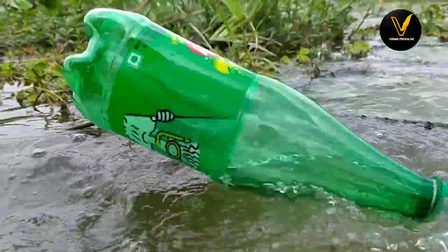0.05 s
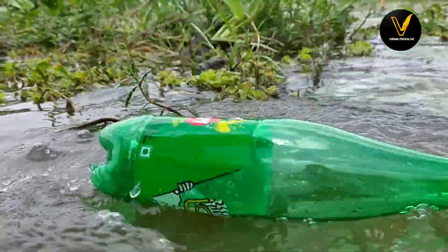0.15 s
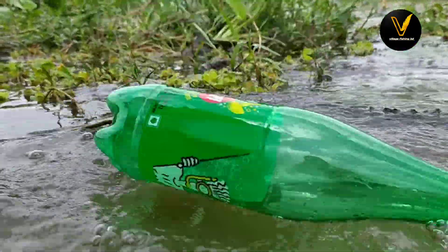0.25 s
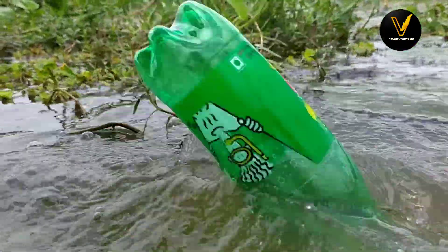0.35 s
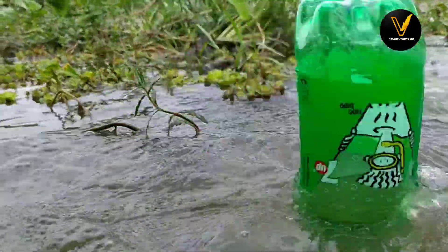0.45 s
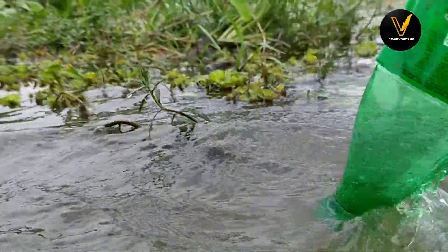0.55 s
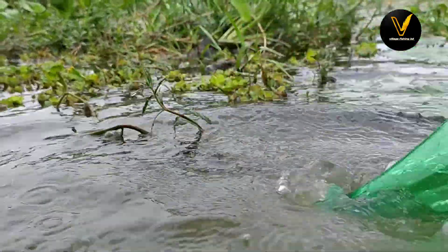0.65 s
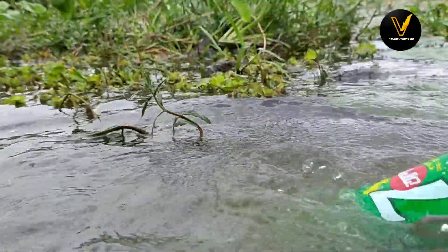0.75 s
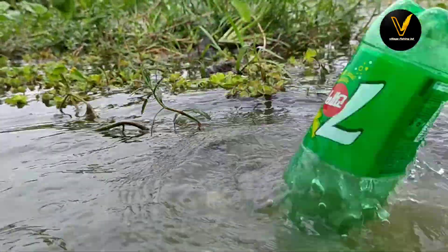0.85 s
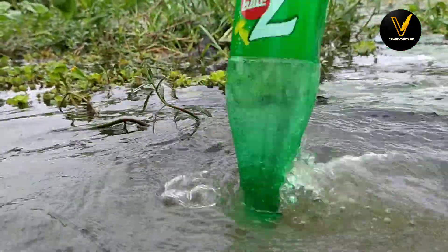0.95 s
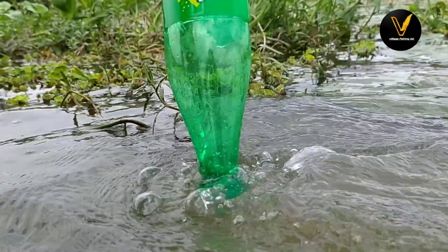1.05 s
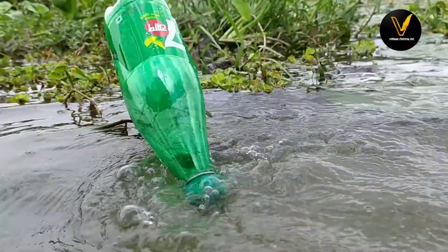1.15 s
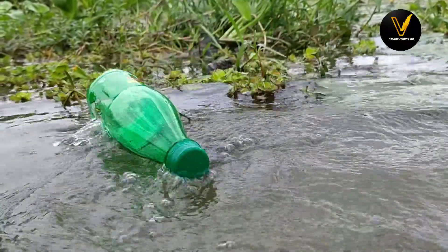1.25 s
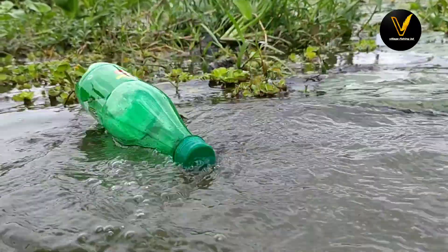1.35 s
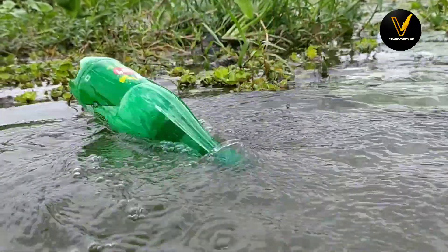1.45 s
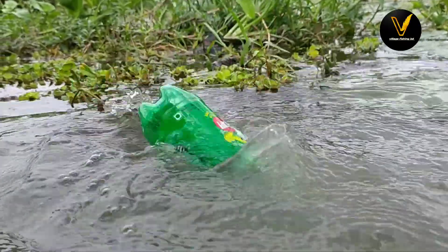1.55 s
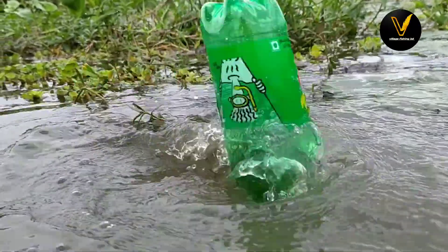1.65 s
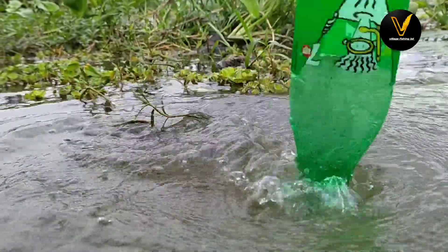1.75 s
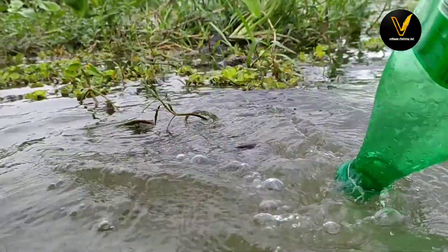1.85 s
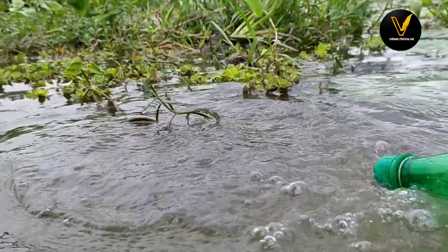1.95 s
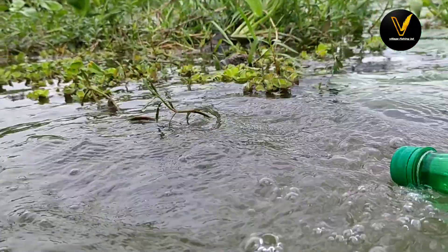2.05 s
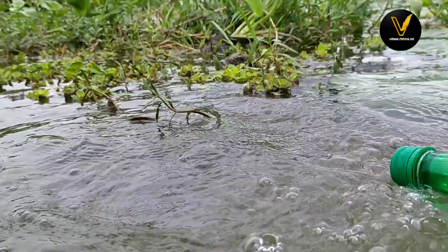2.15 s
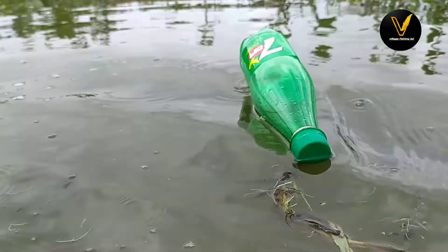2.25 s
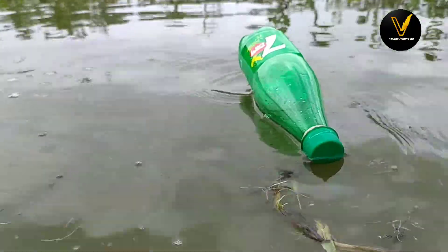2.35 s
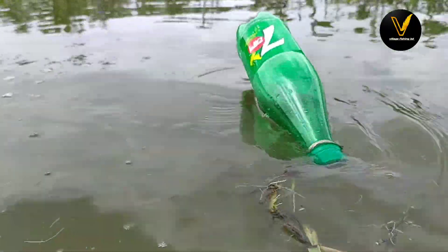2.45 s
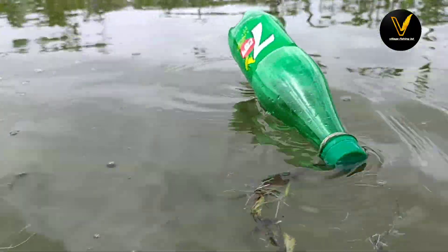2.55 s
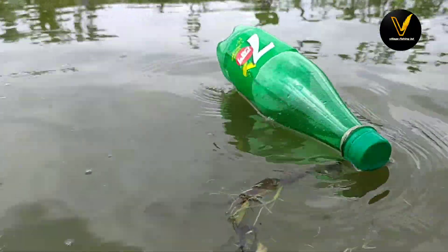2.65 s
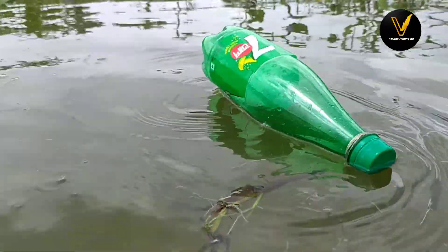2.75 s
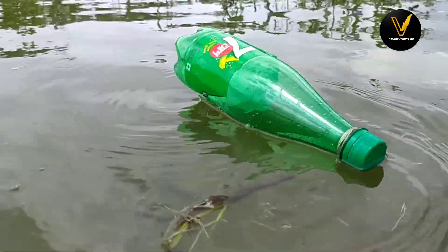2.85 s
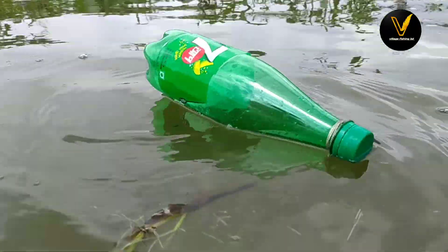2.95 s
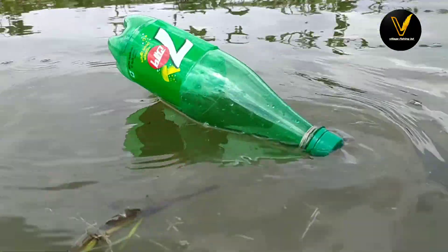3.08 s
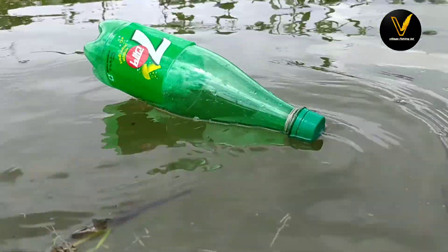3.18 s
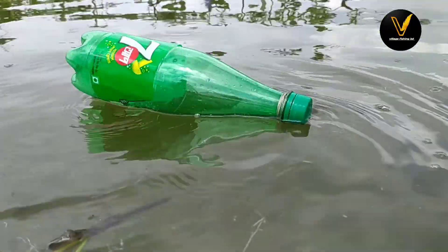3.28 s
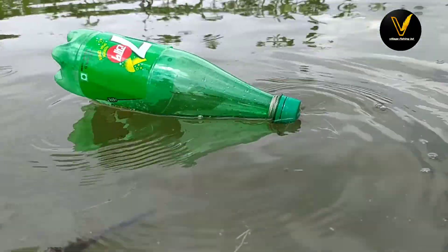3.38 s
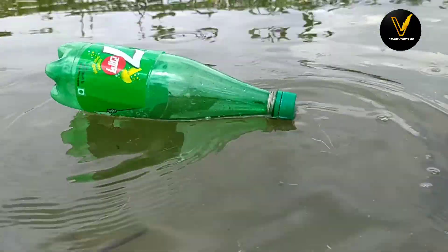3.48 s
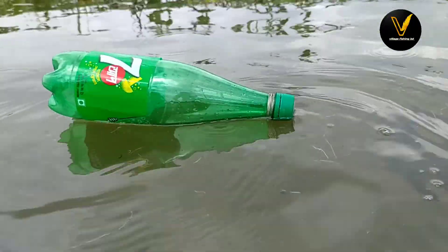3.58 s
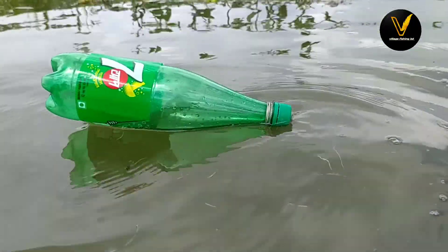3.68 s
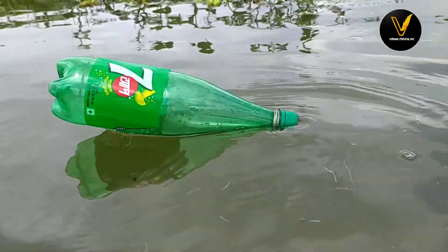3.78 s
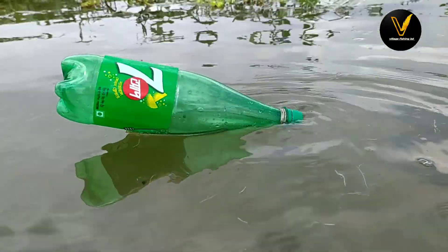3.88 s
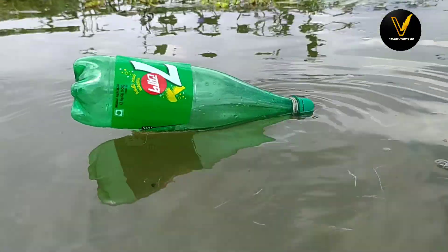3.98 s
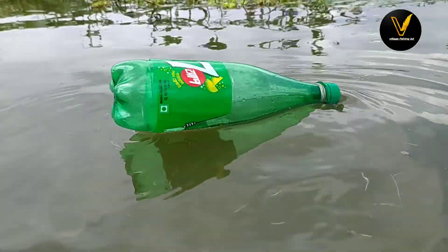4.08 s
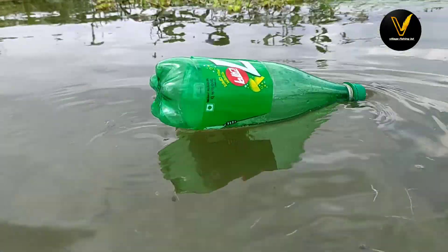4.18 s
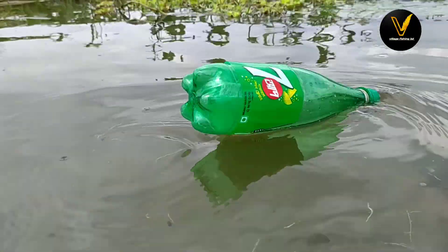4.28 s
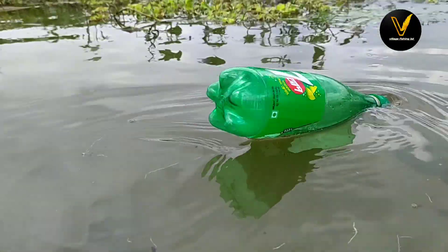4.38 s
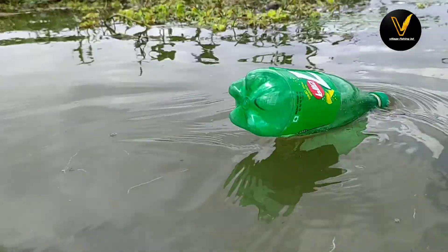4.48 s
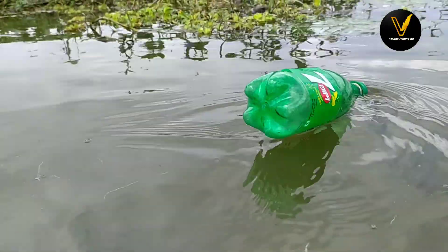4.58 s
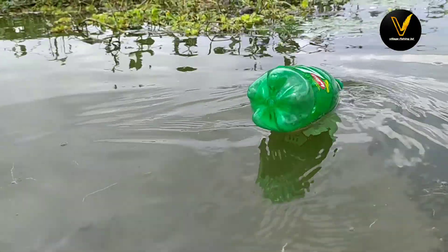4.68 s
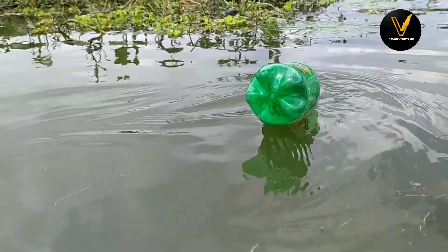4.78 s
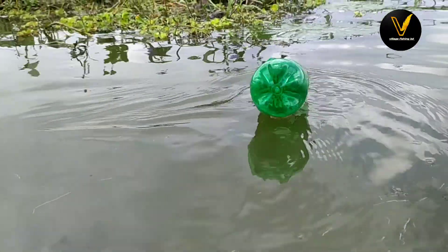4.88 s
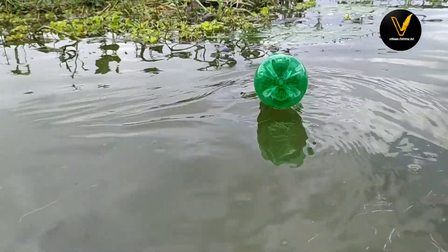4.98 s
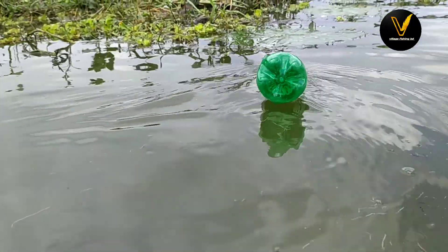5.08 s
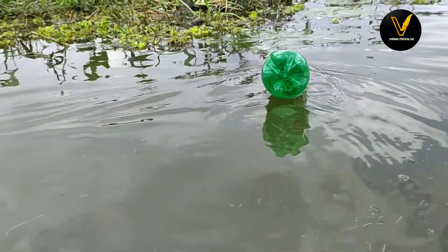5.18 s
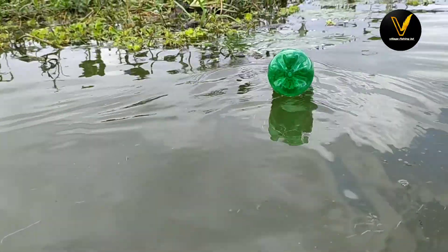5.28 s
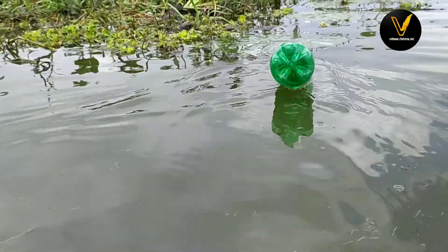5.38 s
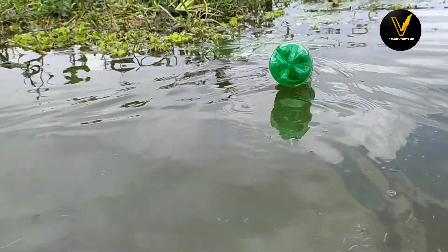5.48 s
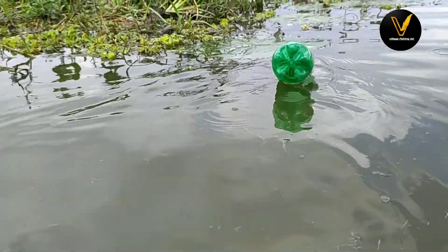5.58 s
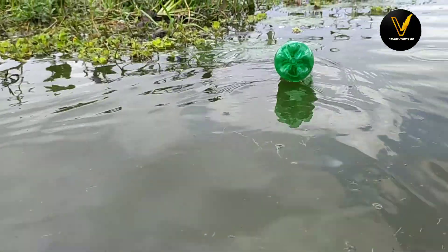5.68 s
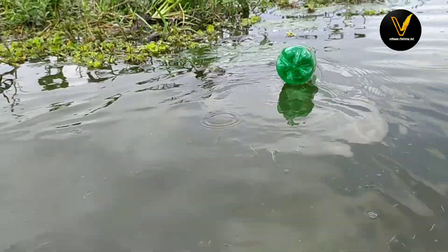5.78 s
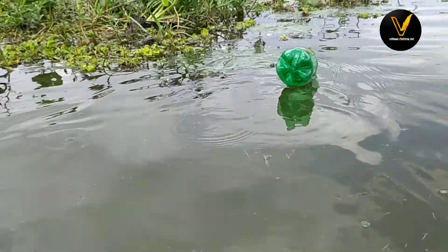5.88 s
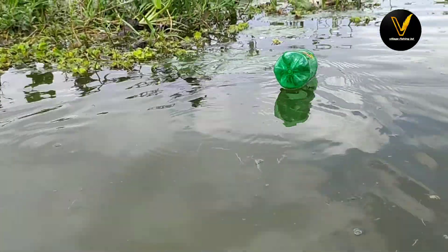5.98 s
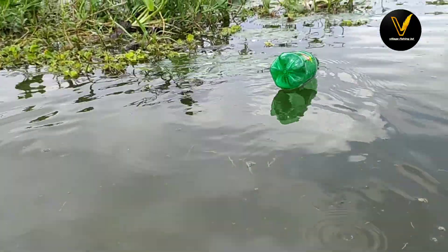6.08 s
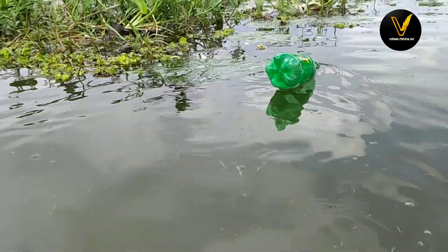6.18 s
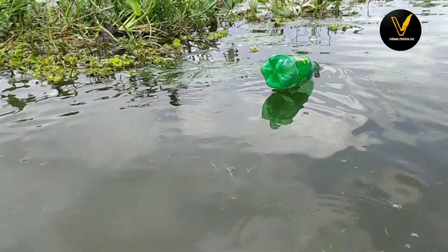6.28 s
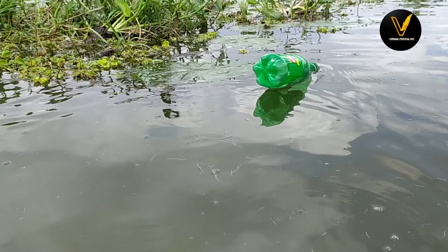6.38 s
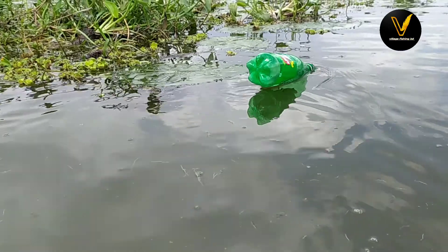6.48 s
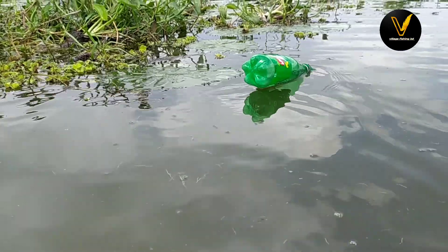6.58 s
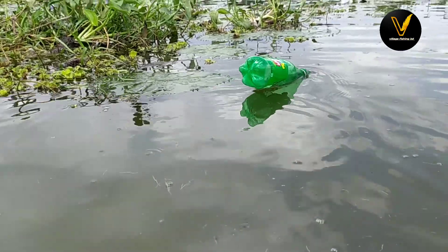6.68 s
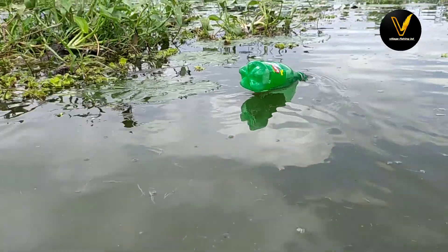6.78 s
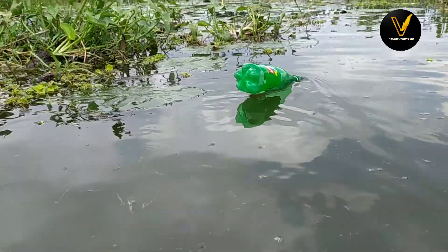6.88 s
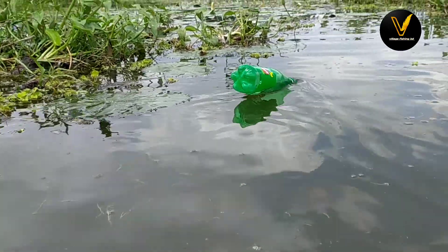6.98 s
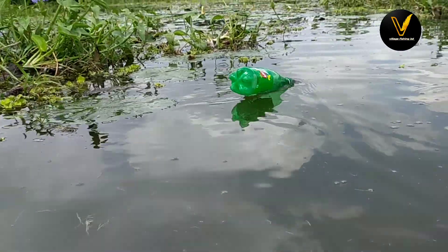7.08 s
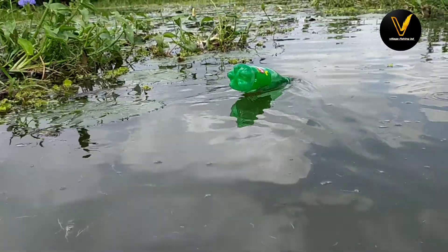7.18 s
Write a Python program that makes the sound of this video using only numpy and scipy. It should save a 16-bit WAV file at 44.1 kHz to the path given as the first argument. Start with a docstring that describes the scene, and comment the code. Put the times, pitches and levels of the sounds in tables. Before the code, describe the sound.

A plastic bottle is dunked repeatedly in a pond, making bubbly plops, clicking drops and fizzing spray while wind rumbles and thumps on the microphone. The bottle slaps the water sharply, and just after two seconds the sound briefly cuts out. It returns much quieter, with a fading hiss of foam, a distant engine chugging in the open air and, later, very faint bird whistles.

```python
"""A plastic bottle is dunked in a pond: trapped air resonates in plops, drops click and spray fizzes,
while wind eddies buffet two microphone ports. At 1.8 s the bottle slaps the surface and its wall rings.
Near 2.3 s the wind falls and the sound drops out briefly. It returns calmer: bursting foam hisses away,
and the firings of a far single-cylinder engine are heard in soft air. From 4 s small birds whistle."""
import sys
import numpy as np
from scipy import signal
from scipy.fft import rfft, irfft
from scipy.io import wavfile
from scipy.ndimage import uniform_filter1d

SR = 44100
rng = np.random.default_rng(int(sys.argv[2]) if len(sys.argv) > 2 else 0)


def pcm_store(signal):
    """Save signal as 16-bit PCM."""
    levels = np.round(np.clip(np.atleast_2d(signal), -1, 1) * 32767)
    wavfile.write(sys.argv[1], SR, levels.astype(np.int16).T)


N = 318843

# Large bubbles: t/s, level/dB, starting f/Hz, time to peak/ms, initial glide/(octave/s)
BUBBLES = [(.006, -51, 682, 16, 5.5), (0.071, -36.5, 1390, 4.3, -3), (.212, -37, 1215, 2.9, -8),
           (.249, -38, 953, 3.8, -5), (.262, -35.5, 922, 3.4, 7.5), (.272, -40.5, 834, 8.1, 10.5),
           (.332, -37.5, 910, 3.2, 14), (.612, -29, 987, 3.8, 5), (.621, -29.5, 676, 3.3, -5),
           (.655, -26, 1226, 2.25, 6), (0.656, -30, 1936, 2.4, 0), (0.669, -36, 525, 7.1, 10.5),
           (.741, -25.5, 1226, 2.4, 1), (.815, -45.5, 503, 15.3, 24.5), (0.82, -43.5, 1650, 4.6, 17),
           (.993, -43, 845, 3.9, 1), (.992, -38, 1850, 3.3, 5), (1.182, -40.5, 1680, 3.1, 20),
           (1.212, -39, 1028, 12, 13.5), (1.236, -27.5, 956, 6, 40.5), (1.270, -37.5, 1110, 5, -2.5),
           (1.330, -43.5, 717, 8.3, 13), (1.483, -33.5, 497, 2.4, 16), (1.763, -41, 1250, 2.4, -1),
           (1.774, -30, 960, 4.1, 10), (1.815, -18, 956, 4.1, -6), (1.830, -32, 488, 5.7, -4),
           (1.985, -42.5, 438, 29, 27), (2.024, -39.5, 1475, 5.1, 10)]
# Drop impacts: t/s, level/dB, centre f/Hz
DROPS = [(0.2163, -30, 6440), (0.2478, -29.5, 4840), (0.327, -32.5, 4500), (0.381, -19, 8800),
         (0.627, -27, 9800), (0.679, -28.5, 9400), (0.774, -35.5, 10200), (0.813, -37, 8650),
         (0.9663, -24.5, 7400), (1.1, -35, 9800), (1.157, -29, 2850), (1.1788, -21.5, 6600),
         (1.2162, -19, 6770), (1.241, -26, 3580), (1.27, -43, 8800), (1.435, -31, 7260), (1.476, -27, 8360),
         (1.492, -15, 7740), (1.547, -35, 12300), (1.649, -34, 7700), (1.759, -28.5, 7450),
         (1.83, -15, 8270), (1.8295, -15.5, 2800), (1.8363, -28.5, 8400), (1.943, -37, 8050),
         (2.007, -34.5, 4100), (2.016, -30, 9000), (2.0925, -24, 9400), (2.111, -42, 8500),
         (2.5386, -38, 9160), (7.1482, -46.5, 10400)]
# Strokes of the bottle through the water: t/s, level/dB, hold/s
STROKES = [(.005, -55, 0.062), (.21, -50, 0.026), (.33, -42.5, 0.003), (.615, -47, 0.0093),
           (.965, -45.5, 0.044), (1.22, -50.5, 0.091), (1.478, -45.5, 0.01), (1.76, -46.5, 0.0031),
           (1.833, -35, 0.0033), (2.01, -48, 0.011), (2.09, -46, 0.003), (2.235, -53, 0.033)]
# Spectrum of the spray: f/Hz, relative level/dB
SPRAY_SPECTRUM = [(700, -42.5), (950, -15.5), (1600, -6.5), (3400, -10.5), (6000, -16), (8600, -5),
                  (11500, -18), (16000, -21)]
# Spectrum of the foam: f/Hz, relative level/dB
FOAM_SPECTRUM = [(1470, -2.5), (3400, -1.5), (4200, -7), (7300, -16.5), (10200, -3), (13300, -0.5),
                 (16000, -11)]
# Modes of the plastic wall: f/Hz, relative level/dB, T60/s
WALL_MODES = [(1355, 1.5, 0.012), (1960, -6.5, .022), (2580, 2.5, .015), (3316, -4, .02),
              (4100, -4.5, 0.012)]
# Spectrum of the wind: f/Hz, relative level/dB
WIND_SPECTRUM = [(12, -20), (20, 1), (55, 4), (195, -5.5), (416, -20.5), (700, -36.5), (910, -51)]
# Gust in the calm: t/s, level/dB, hold/s
GUSTS = [(3.04, -51, 0.073)]
# Eddies striking the ports: t/s, level/dB, starting f/Hz
THUDS = [(0.281, -30, 99.6), (1.014, -33, 328), (1.062, -29.5, 235), (1.089, -27, 173), (1.112, -35.5, 290),
         (1.435, -31, 137), (1.51, -32.5, 100), (1.59, -30, 85.7), (1.878, -31.5, 198.5),
         (1.978, -32.5, 198), (2.108, -40, 191)]
# Block and exhaust modes: delay after firing/ms, f/Hz, T60/ms, level/dB, fractional pitch scatter
ENGINE_MODES = [(0, 480, 11, -52, .1), (9, 213.4, 75, -48.5, .06), (10.5, 355, 66, -57, .08),
                (1.5, 528, 290, -65, 0.02)]
# Bird whistles: t/s, starting f/Hz, duration/s, level/dB
CHIRPS = [(4.035, 6100, 0.084, -74), (4.12, 3800, 0.096, -79), (4.435, 6500, .07, -77),
          (4.685, 6300, .1, -80.5), (5.05, 6300, .07, -80), (5.34, 6400, 0.079, -84),
          (5.64, 6600, 0.1, -79), (5.875, 7300, .085, -79), (6.225, 4700, 0.083, -73),
          (6.70, 6300, 0.089, -81), (6.97, 6900, 0.064, -82)]
# Spectrum of the open air: f/Hz, relative level/dB
AIR_SPECTRUM = [(60, -16.5), (108, -1), (458, -9), (682, -13), (2250, -23.5), (4970, -35.5), (16000, -40)]
# Likeness of the air at the two ports: f/Hz, coherence (0-1)
AIR_COHERENCE = [(200, 1), (640, 0.4), (1400, 0.11)]
# Balance of the air: f/Hz, left minus right level/dB
AIR_BALANCE = [(200, 0.3), (3000, 4), (8000, -3.5), (15000, 10)]

LEFT_LAG_S = .00019  # the splashing reaches the left port later
DROPOUT_S, RETURN_S = 2.254, 2.323


def water():
    """Bubbles and impacts radiate the sound of water; spray follows the strokes, then foam takes over."""
    t = np.arange(N) / SR
    splashes = plops() + drops()
    small_bubbles = churn()
    ripple = (.0063, -59.5, 2.03)  # weak stirring between strokes
    stirring = bursts(STROKES + [ripple], rise_db_s=895.5, fall_db_s=279.5)
    spray = crackle(SPRAY_SPECTRUM, per_s=720, spread_db=7.5, flicker_db=5.5, shared=.3)
    spray = stirring * (spray + undb(-7.5) * small_bubbles)
    foam_db = -79 + 23 * .5 ** ((t - RETURN_S) / 3.62)
    foam = undb(foam_db) * crackle(FOAM_SPECTRUM, per_s=650, spread_db=8, flicker_db=2.5, shared=.16)
    return splashes + undb([[1.8], [-1.8]]) * np.where(t < RETURN_S, spray, foam)


def plops():
    """Bubble resonance: each large air pocket rings, with the gas as spring and the water as mass."""
    out = np.zeros((2, N))
    for s, db, hz, peak_ms, glide in BUBBLES:
        plop = undb(db) * bubble(hz, peak_ms, glide, rough=.74)
        add(out, s, plop, pan_db=-.5, lag_s=.00011 if s > 1.4 else .00003)  # the bottle shifts right
    return slosh(out)


def bubble(hz, peak_ms, glide, rough, max_samples=4096):
    """A damped oscillator swells and fades as its pitch glides; random modulation roughens the tone."""
    t = np.arange(min(int(6 * peak_ms * SR / 1000) + 2, max_samples)) / SR
    age = 1000 * t / peak_ms
    noise = rng.standard_normal((2, max_samples))[:, :len(t)]
    pitch_wobble, level_wobble = uniform_filter1d(noise, int(SR / hz) + 1) * np.sqrt(SR / hz)
    pitch = hz * 2 ** (glide * t / (1 + .078 * age)) * (1 + .12 * rough * pitch_wobble)
    envelope = (age * np.exp(1 - age)) ** 1.3 * (1 + .28 * rough * level_wobble)
    return envelope * np.sin(2 * np.pi * np.cumsum(pitch) / SR)


def slosh(sound, decay_s=.01):
    """Secondary excitation: the bottle's cavity rings on after each plop, prolonging it with a ragged tail."""
    age = np.arange(4096) / SR / decay_s
    tail = rng.standard_normal(len(age)) * age * np.exp(-age)
    return sound + undb(-15.5) * signal.fftconvolve(sound, [tail / np.linalg.norm(tail)])[:, :N]


def drops():
    """Impact excitation: each drop gives a broadband snap and a brief band-limited ring."""
    out, ms = np.zeros((2, N)), 1000 * np.arange(1500) / SR
    for (s, db, hz), noise in zip(DROPS, rng.standard_normal((len(DROPS), len(ms)))):
        decay_ms = .7 + .068 * max(db + 39, 0)  # bigger drops splash longer
        burst = noise * (1 - np.exp(-ms / .17)) * np.exp(-ms / decay_ms)
        spread = 1.09 + .25 * (hz / 8000) ** 2  # finer drops ring less purely
        band_hz = [hz / spread, min(hz * spread, .45 * SR)]
        ring = signal.lfilter(*signal.butter(2, band_hz, "band", fs=SR), burst)
        snap = np.diff(burst, prepend=0)
        click = ring / np.abs(ring).max() + .37 * snap / np.abs(snap).max()
        add(out, s, undb(db) * click, pan_db=3.5 + 2.5 * noise[0], lag_s=LEFT_LAG_S)
    return out


def churn():
    """Many small resonators superpose, each bubble rising in pitch as it nears the surface."""
    out = np.zeros((2, N))
    for onset, height, strength, cycles, side in rng.random((900, 5)):
        hz = 650 * 2 ** (4.1 * height ** 1.5)
        ring = bubble(hz, peak_ms=1000 * (4.2 + cycles) / hz, glide=31, rough=.86, max_samples=512)
        ring *= undb(15.1 * strength ** 4.2)
        add(out, 2.25 * onset, ring, pan_db=6 * (side - .5), lag_s=LEFT_LAG_S * 1.8 * side)
    return out


def crackle(spectrum, per_s, spread_db, flicker_db, shared):
    """Shot noise: tiny bubbles burst at random, as clicks over a hiss partly shared by the ports."""
    pops = rng.random((3, N)) < per_s / SR
    sizes = undb(spread_db * np.minimum(rng.exponential(size=(3, N)), 3))
    hiss = rng.standard_normal((3, N))
    left, right, both = hiss + signal.lfilter(*signal.butter(2, 4000, "high", fs=SR), hiss * pops * sizes)
    grain = np.array([left + shared * np.roll(both, int(LEFT_LAG_S * SR)), right + shared * both])
    sound = filtered(grain, undb(over_hz(spectrum)))
    sound /= np.sqrt(np.mean(sound ** 2))
    coarse = signal.lfilter(*signal.butter(2, 4000, fs=SR), sound)
    fine = sound - coarse
    return coarse * undb(flicker_db * walk(130)) + fine * undb(flicker_db * walk(160))


def bottle_slap():
    """Modal ringing: a flat blow on the water excites the damped modes of the plastic wall."""
    out, t = np.zeros((2, N)), np.arange(2048) / SR
    for (hz, db, t60), noise in zip(WALL_MODES, rng.standard_normal((len(WALL_MODES), len(t)))):
        roughness = 1 + 1.3 * uniform_filter1d(noise, 30)
        envelope = (t / (t + .00085)) ** 2 * undb(-60 * t / t60) * roughness
        ring = np.sin(2 * np.pi * hz * t + noise[0]) * envelope / np.abs(envelope).max()
        add(out, 1.8276, undb(db - 7.5) * ring, pan_db=2, lag_s=.00022)
    return out


def wind(lull_s=2.129, calm_db=-63.5):
    """Turbulent pressure acts on each port independently, the right harder: rumble, flutter and thuds."""
    out, t = np.zeros((2, N)), np.arange(N) / SR
    breeze_db = np.maximum(-39.5 + t - 136 * np.maximum(t - lull_s, 0), calm_db)  # builds, then drops
    strength = undb(breeze_db) + bursts(GUSTS, rise_db_s=504, fall_db_s=303.5)
    spectrum = undb(over_hz(WIND_SPECTRUM))
    bass_share = over_hz([(60, 1), (180, .029)])
    for port, port_db in enumerate((-4, 4)):
        rumble = filtered(rng.standard_normal(N), spectrum * bass_share) * undb(.89 * walk(6))
        flutter = filtered(rng.standard_normal(N), spectrum * (1 - bass_share)) * undb(4.5 * walk(22))
        pressure = rumble + flutter
        out[port] = undb(port_db) * strength * pressure / pressure.std()
    for s, db, hz in THUDS:
        add(out, s - .003, undb(db) * bubble(hz, peak_ms=6.3, glide=-21, rough=1), pan_db=-16.5)
    return out


def engine(firing_hz=16.654):
    """Periodic impulse excitation: each slightly uneven firing rings the block and the exhaust."""
    out, t = np.zeros((2, N)), np.arange(4000) / SR
    for k, (*strengths, deviation) in enumerate(rng.standard_normal((int(N / SR * firing_hz), 5))):
        firing_s = .0319 + k / firing_hz + .00027 * abs(deviation)
        for (delay_ms, hz, t60_ms, db, scatter), strength in zip(ENGINE_MODES, strengths):
            ring = np.sin(2 * np.pi * hz * (1 + scatter * deviation) * t) * undb(-60 * 1000 * t / t60_ms)
            add(out, firing_s + delay_ms / 1000, -undb(db + 2 * strength) * ring, pan_db=.3)
    return out


def birds(floor_ratio=.66):
    """Frequency modulation: thin, ragged whistles drop fast and level out, mostly on the left."""
    out = np.zeros((2, N))
    for (s, hz, length_s, db), noise in zip(CHIRPS, rng.standard_normal((len(CHIRPS), 8192))):
        progress = np.linspace(0, 1, int(length_s * SR))
        flutter = uniform_filter1d(noise, 200)[:len(progress)]
        pitch = hz * (floor_ratio + (1 - floor_ratio) * np.exp(-1.7 * progress) + .185 * flutter)
        envelope = undb(db) * (1 + 6 * flutter) * np.sin(np.pi * progress) ** .4
        add(out, s, envelope * np.sin(2 * np.pi * np.cumsum(pitch) / SR), pan_db=12)
    return out


def air():
    """A diffuse field: distant noise is coherent at the ports in the bass, barely so in the treble."""
    coherence = np.clip(over_hz(AIR_COHERENCE), 0, 1)
    mid, side = rfft(rng.standard_normal((2, N)))
    sign = np.array([[1], [-1]])
    spectra = mid * np.sqrt(1 + coherence) + sign * side * np.sqrt(1 - coherence)
    wash = irfft(spectra * undb(over_hz(AIR_SPECTRUM) + sign * over_hz(AIR_BALANCE) / 2), N)
    return undb(-59 + .12 * walk(3.8)) * wash / wash.std()


def bursts(rows, rise_db_s, fall_db_s):
    """Exponential growth, hold and decay: the summed gain of (t/s, level/dB, hold/s) events."""
    t = np.arange(N) / SR
    return sum(undb(db - rise_db_s * np.maximum(s - t, 0) - fall_db_s * np.maximum(t - s - hold, 0))
               for s, db, hold in rows)


def add(out, s, sound, pan_db, lag_s=0):
    """Level and time differences give direction: the left is pan_db stronger and lag_s later."""
    for port, delay, sign in ((0, lag_s, 1), (1, 0, -1)):
        i = int((s + delay) * SR)
        piece = sound[:max(N - i, 0)]
        out[port, i:i + len(piece)] += piece * undb(sign * pan_db / 2)


def walk(rate_hz):
    """Low-pass fluctuation: random steps, smoothed twice, with a spread near 1."""
    hold = int(SR / rate_hz)
    steps = np.repeat(rng.standard_normal(N // hold + 1), hold)
    return uniform_filter1d(uniform_filter1d(steps, hold), hold)[:N]


def filtered(x, gain):
    """Linear filtering by a gain per FFT bin."""
    return irfft(rfft(x) * gain, N)


def over_hz(points):
    """Log-frequency interpolation of (f/Hz, value) points onto the FFT bins."""
    hz, value = np.transpose(points)
    return np.interp(np.log(np.arange(N // 2 + 1) * SR / N + 1), np.log(hz), value)


def undb(db):
    """Amplitude ratio of a level in dB."""
    return 10 ** (np.asarray(db) / 20)


def scene():
    """Superposition: the pressures of all sources add at the two ports."""
    return water() + bottle_slap() + wind() + engine() + birds() + air()


def record(dry, top_hz=15700):
    """Gain and band limiting: a quick fade to silence, a slower return 1 dB higher, then a low-pass."""
    t = np.arange(N) / SR
    fade_out = undb(-3008 * np.maximum(t - DROPOUT_S, 0))
    fade_in = undb(1) * np.clip((t - RETURN_S) / .16, 0, 1)
    low_pass = signal.ellip(10, .2, 70, top_hz, fs=SR, output="sos")
    return signal.sosfilt(low_pass, dry * (fade_out + fade_in))


dry = scene()
out = record(dry)
pcm_store(out)
```